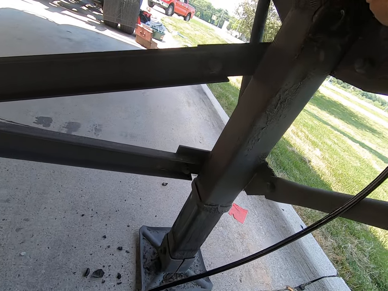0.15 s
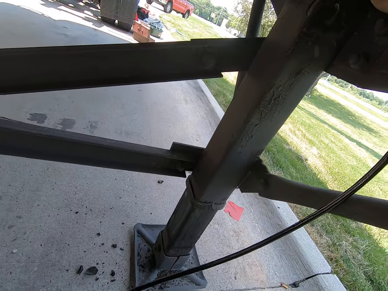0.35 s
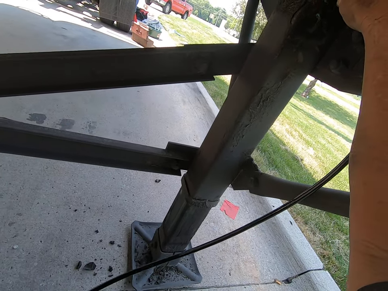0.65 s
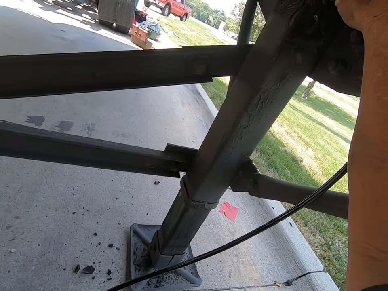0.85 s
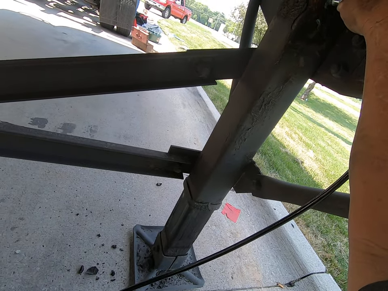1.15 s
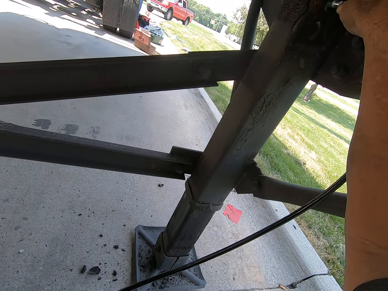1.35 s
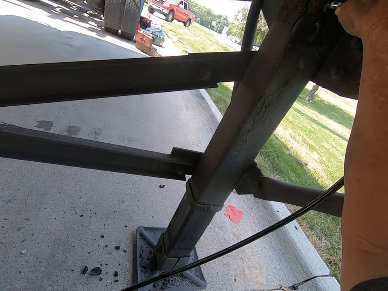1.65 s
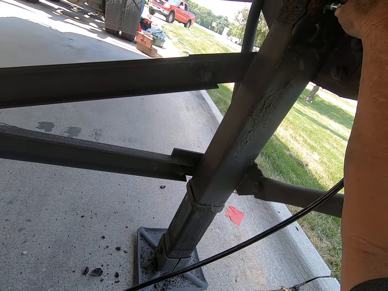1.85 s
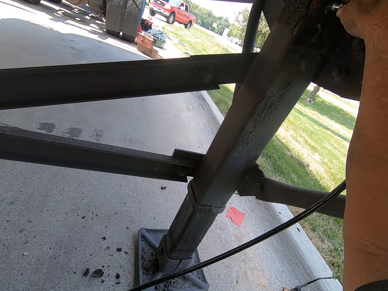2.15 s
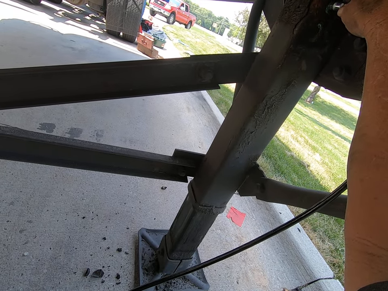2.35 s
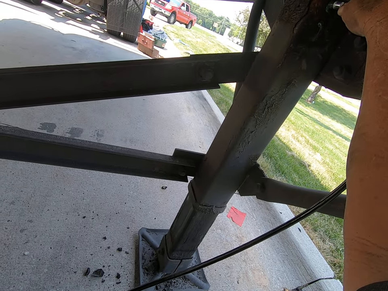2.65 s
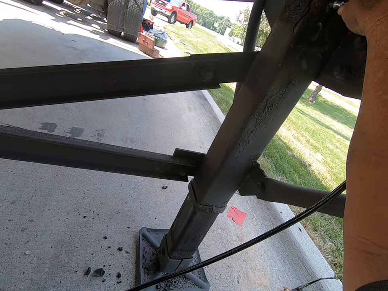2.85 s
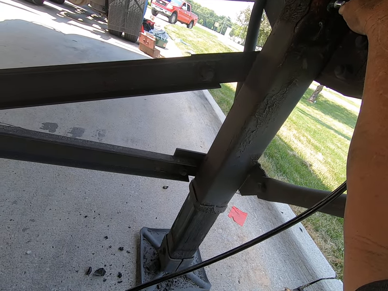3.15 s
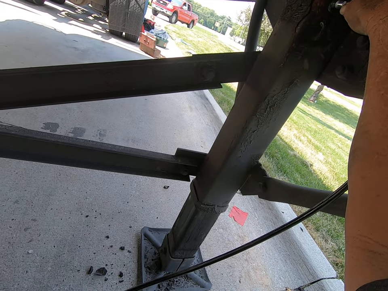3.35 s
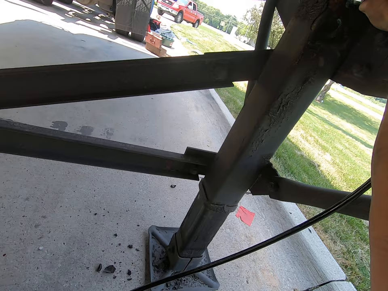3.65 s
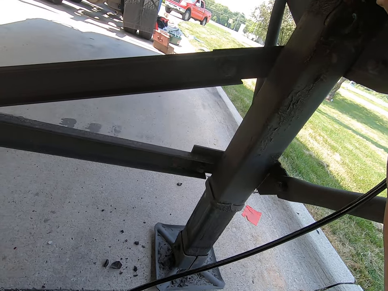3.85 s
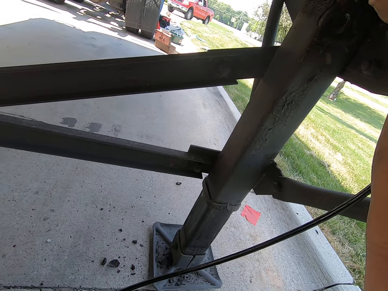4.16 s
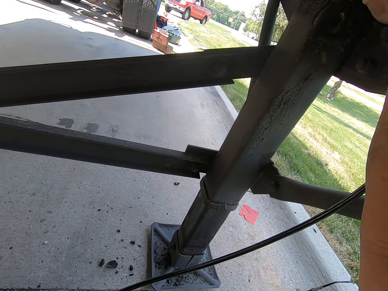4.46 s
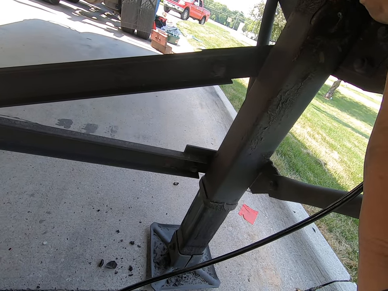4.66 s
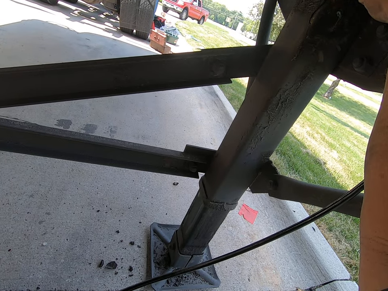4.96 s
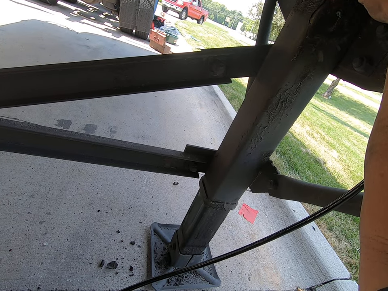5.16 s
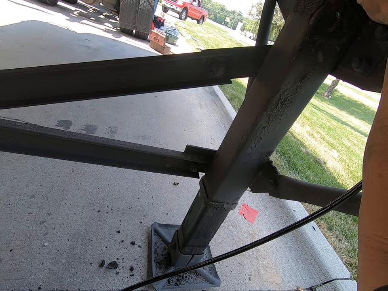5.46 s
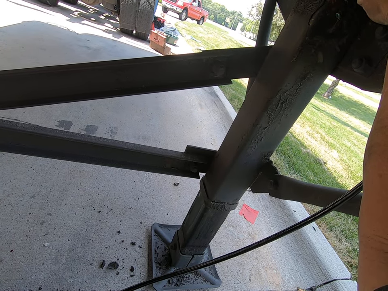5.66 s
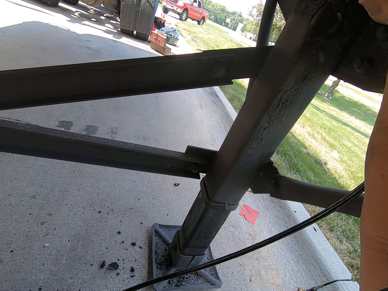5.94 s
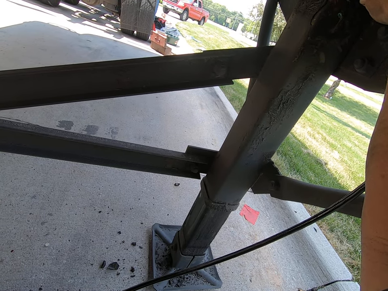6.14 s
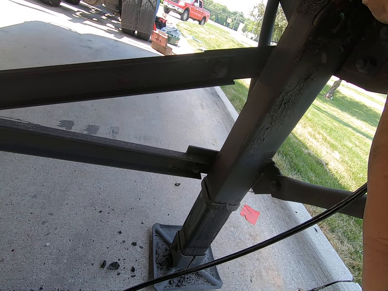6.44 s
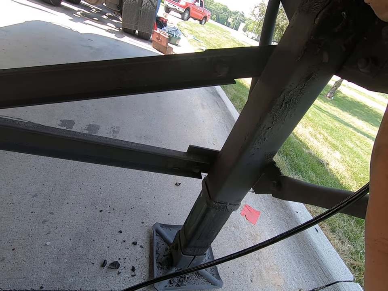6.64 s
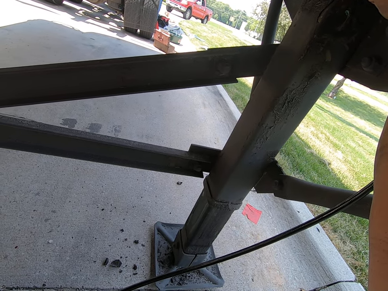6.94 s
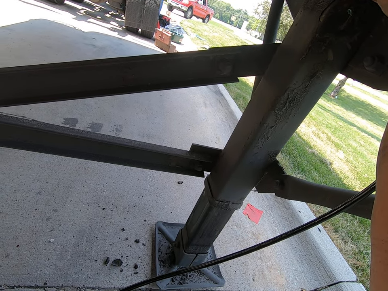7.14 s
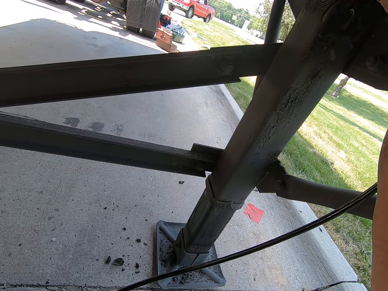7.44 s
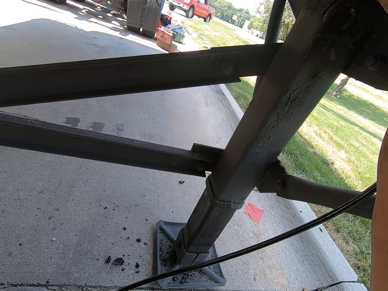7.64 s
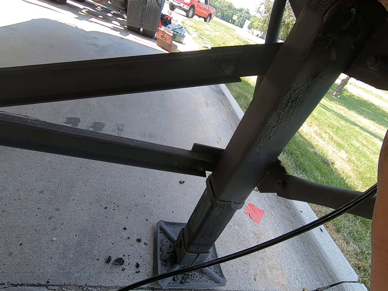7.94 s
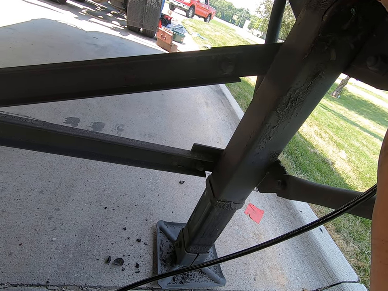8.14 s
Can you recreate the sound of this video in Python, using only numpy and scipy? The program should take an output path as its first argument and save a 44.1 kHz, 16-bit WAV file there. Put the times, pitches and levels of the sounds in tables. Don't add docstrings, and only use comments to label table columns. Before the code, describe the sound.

Outdoors, close stereo microphone, with idling machines farther off. From 0 seconds a low, slowly beating engine hum and rough rumble sit under a faint blower tone, thin hiss and soft wind buffeting, strongest in the first two seconds. At about 0.2 a hard metal coupler knocks a steel frame, rings briefly and rattles dully. Near 0.75 a small trigger clicks; a very short electronic whistle follows as the motor spins up by about 0.95. From 1.0 to the end near 8.3 the cordless grease gun pumps without stopping, about seven strokes a second: each a sharp bright clack with a body slap, gears whining upward around four kilohertz, then a smaller bite and gritty grind as pressure loads it and pitch sags. The rhythm is mechanical and very even, growing barely harder. The gun dominates; engine drone continues beneath.

```python
import sys
import numpy as np
from scipy import signal
from scipy.fft import rfft, irfft, next_fast_len
from scipy.io import wavfile
from scipy.ndimage import uniform_filter1d

SR = 44100
rng = np.random.default_rng(int(sys.argv[2]) if len(sys.argv) > 2 else 0)


def elevation(decibels):
    levels = np.asarray(decibels, float)
    return 10 ** (levels / 20)


def master_out(mix):
    frames = np.transpose(np.atleast_2d(mix))
    ceiling = np.clip(frames, -1, 1)
    pcm = np.round(ceiling * 32767).astype(np.int16)
    wavfile.write(sys.argv[1], SR, pcm)


N = 365897
T = np.arange(N) / SR
M = next_fast_len(N + SR // 4)
F = np.maximum(np.arange(M // 2 + 1) * SR / M, 1)

TURN_S = .1361
# f/Hz, likeness [0-1]
GUN_ALIKE = [(60, 0.95), (130, 0.99), (290, 1), (640, 0.77), (1410, 0.39), (3100, 0.79), (6820, 0.21),
             (15000, 0.04)]
# f/Hz, likeness [0-1], values below 0 count as 0
YARD_ALIKE = [(60, 1), (130, 1), (290, 0.91), (640, 0.8), (1410, 0.033), (3100, 0.42), (6820, -0.75),
              (15000, -0.04)]
# f/Hz, level/dB per Hz
THUD_TONE = [(300, -10), (550, 0), (900, -8), (2500, -1), (4500, -4), (7000, -9), (9000, -8), (11500, -20),
             (15000, -32)]


def along(table, t):
    s, *columns = np.transpose(table)
    return [np.interp(t, s, column) for column in columns]


def over_hz(table):
    hz, value = np.transpose(table)
    return np.interp(np.log(F), np.log(np.maximum(hz, 1)), value)


def body(tone, modes=(), lift=0.75):
    db = over_hz(tone)
    for hz, width_hz, mode_db in modes:
        db = db + lift * mode_db / (1 + (2 * (F - hz) / width_hz) ** 2)
    cepstrum = irfft(np.log(elevation(db)), M)
    cepstrum[1:M // 2] *= 2
    cepstrum[M // 2 + 1:] = 0
    response = np.exp(rfft(cepstrum))
    return response / np.sqrt(np.mean(np.abs(response) ** 2))


def sound(spectra):
    return irfft(spectra, M)[:, :N]


def ports(drive, response, alike, balance=((20, 0), (20000, 0))):
    mid, side = rfft(drive, M) * response
    likeness = np.clip(over_hz(alike), 0, .99)
    tilt = elevation(over_hz(balance) / 2)
    mid = mid * np.sqrt((1 + likeness) / 2)
    side = side * np.sqrt((1 - likeness) / 2)
    return sound(np.array([(mid + side) * tilt, (mid - side) / tilt]))


def walk(rate):
    hold = int(SR / rate)
    steps = np.repeat(rng.standard_normal(N // hold + 1), hold)
    return 1.065 * uniform_filter1d(uniform_filter1d(steps, hold), hold)[:N]


def hiss(envelope, grit_db=0.):
    grain = elevation(grit_db * np.minimum(rng.exponential(size=N), 5))
    return rng.standard_normal((2, N)) * envelope * grain / np.sqrt(np.mean(grain ** 2))


def bursts(starts, contacts, repeat=0.):
    span = int(6 * SR * max(row[1] for row in contacts))
    out = np.zeros((2, N + SR))
    same = rng.standard_normal((len(contacts), 2, span))
    for s, db in starts:
        for (lag, length, rel_db, scatter_db), habit in zip(contacts, same):
            level_chance, time_chance = np.clip(rng.standard_normal(2), -1.5, 1.5)
            fresh = rng.standard_normal((2, span))
            noise = np.sqrt(repeat) * habit + np.sqrt(1 - repeat) * fresh
            u = np.arange(span) / (length * SR)
            shape = np.minimum(3 * u, 1) * np.exp(-1.5 * u)
            hit = noise * shape
            hit *= np.sqrt(np.sum(shape ** 2) / np.sum(hit ** 2, axis=1, keepdims=True))
            i = int((s + lag + 0.00019 * scatter_db * time_chance) * SR)
            out[:, i:i + span] += elevation(db + rel_db + scatter_db * level_chance) * hit
    return out[:, :N]


def engines():
    crank_hz = (14.2185, 18.6635, 16.252, 138.01)
    # multiple of the crank rate, level/dB rms
    truck = [(2, -72), (4, -39.5), (5, -44.5), (9, -48.5), (10, -52), (11, -64), (12, -39.5), (13, -43),
             (16, -58), (17, -54.5)]
    pump = [(3, -34.5), (5, -48), (6, -46.5), (7, -70), (8, -52)]
    reefer = [(2, -42), (3, -55), (5, -51), (8, -47), (10, -52)]
    fan = [(1, -34.5), (2, -53)]
    null_s = 4.34
    hum = 0
    for sign, hz, orders in zip((1, -1, 1, 1), crank_hz, (truck, pump, reefer, fan)):
        for k, db in orders:
            level = sign * elevation(db + 1.0 * walk(3.26))
            hum = hum + level * np.sin(2 * np.pi * int(round(k)) * hz * (T - null_s) + np.pi / 2)
    return np.sqrt(2) * hum * elevation(np.array([[-.3], [.3]]))


def gusts():
    # t/s, level/dB
    peaks = [(0, -26), (1.13, -22.5), (1.71, -29), (3.2, -36), (4.4, -39), (5.45, -34), (6.12, -34)]
    rise_db_per_s, fall_db_per_s, lull_db = 19, 44, -51
    gain = elevation(lull_db)
    for s, db in peaks:
        gain = gain + elevation(db - np.maximum(rise_db_per_s * (s - T), fall_db_per_s * (T - s)))
    return gain


def yard():
    # f/Hz, level/dB per Hz
    idle_tone = [(20, -22), (35, -14), (58, -9), (90, -13), (135, -6), (181, -11), (215, -19), (640, -25),
                 (817, -30), (1080, -26), (1700, -29), (3300, -38), (5500, -52), (15000, -95)]
    hiss_tone = [(3000, -12), (6000, -3), (8500, 0), (10500, -4), (12000, -5), (13500, -11), (15000, -26)]
    wind_tone = [(15, -14), (35, -2), (60, 0), (100, -4), (160, -16), (300, -36), (1000, -70), (8000, -130)]
    # f/Hz, width/Hz, lift/dB
    blower = [(493, 25, 6), (1389, 83, 9)]
    idle_level = elevation(-33.5 + .9 * walk(3.08) + 1.0 * walk(15))
    idle = ports(hiss(idle_level), body(idle_tone, blower), YARD_ALIKE)
    far = ports(hiss(elevation(-66.5)), body(hiss_tone), [(20, .1), (20000, 0)])
    wind_level = gusts() * elevation(-8.0 + 2.0 * walk(5.7))
    wind = ports(hiss(wind_level), body(wind_tone), [(20, 0.19), (20000, 0.25)])
    return idle + far + wind


def knock():
    # t/s, length/s, level/dB, scatter/dB
    tick_hits = [(.2178, .003, -29, 0)]
    blow_hits = [
        (.2182, .003, -12, 0),
        (.221, .0045, -12, 0),
        (.225, .0065, -14, 0),
        (.232, .014, -21, 0),
        (.245, .02, -32, 0),
    ]
    rattle_hits = [
        (.222, 0.019, -29, 0),
        (.245, 0.024, -24.5, 0),
        (.265, 0.02, -34, 0),
        (.28, .014, -32, 0),
    ]
    # f/Hz, level/dB per Hz
    blow_tone = [(150, -24), (250, -17.5), (774, -16.5), (1210, -16), (1790, -22), (2200, -31), (2480, -26),
                 (2700, -41), (3810, -37.5), (5010, -46), (7180, -41.5), (15000, -73)]
    rattle_tone = [(150, -20), (300, -5), (600, 5), (1000, 1), (1500, -14), (3000, -37), (8000, -70)]
    # f/Hz, width/Hz, lift/dB
    frame = [(326, 60, 10), (560, 23, 11), (970, 64, 7), (1230, 85, 7), (1770, 110, 11), (2400, 150, 4),
             (3780, 150, 5)]
    blow = ports(bursts([(0, 0)], blow_hits), body(blow_tone, frame, 0.93), YARD_ALIKE)
    rattle = ports(bursts([(0.0007, 0)], rattle_hits), body(rattle_tone, frame, 0.72), YARD_ALIKE)
    tick = ports(bursts([(0.0038, 0)], tick_hits), body(THUD_TONE, frame), GUN_ALIKE)
    return blow + rattle + tick


def switch():
    # t/s, length/s, level/dB, scatter/dB
    clicks = [
        (0.744, 0.0056, -37, 0),
        (.759, .002, -28, 0),
        (0.7606, 0.0033, -21.5, -1),
        (0.766, 0.011, -38, 0),
    ]
    # f/Hz, level/dB per Hz
    click_tone = [(700, -37), (1500, -10), (2700, -1), (3500, -9), (4400, -8), (5700, -5), (7000, 2),
                  (9000, -10), (11500, -20), (15700, -26)]
    # t/s, level/dB of first tone, level/dB of second tone
    chop_levels = [(.775, -70, -62), (.785, -53, -49), (.805, -44, -48), (.83, -41, -54), (.868, -44, -57),
                   (.885, -60, -70)]
    first_db, second_db = along(chop_levels, T)
    phase = 2 * np.pi * 1985 * T
    chop = elevation(first_db) * np.sin(phase) + elevation(second_db) * np.sin(2 * phase)
    chop = np.sqrt(2) * chop * (np.abs(T - .83) < .06)
    return chop + ports(bursts([(0.00066, 0)], clicks), body(click_tone), GUN_ALIKE)


def gears(turn, run):
    # t/s, level/dB
    load = [(0, -4), (.015, -12.5), (.035, -14.5), (.07, -13.5), (.078, -5.5), (.085, -3), (.11, 0),
            (.136, -4)]
    # f/Hz, level/dB per Hz
    gear_tone = [(290, -26), (500, -16), (602, -8.5), (823, -10.5), (1060, -12), (1610, -7.5), (2230, -4),
                 (4110, -5.5), (4290, -3), (5380, -14.5), (9250, -10.5), (12100, -23.5), (15000, -39)]
    grind_tone = [(290, -46), (500, -8), (859, -9), (1110, -10), (1580, -9), (1750, -11), (2020, -7),
                  (2230, -6), (2960, -5.5), (4110, -5.5), (5380, -10.5), (9120, -9.5), (15000, -35)]
    # f/Hz, width/Hz, lift/dB
    housing = [(705, 20, 4), (848, 51, -17), (1062, 280, 8), (1380, 59, 6.5), (1762, 77, 6),
               (2047, 27, -17.5), (2260, 185, 5), (2536, 24, 3), (2646, 48, 5.5), (3286, 65, 4.5),
               (3660, 68, 2.5), (4950, 93, 6), (5640, 140, 4), (7230, 690, 4), (8310, 85, 1.5),
               (9050, 140, 2)]
    # f/Hz, level/dB
    balance = [(60, -3), (110, 4), (200, -4), (380, 0), (700, -2), (1290, 2.5), (2380, 1.5), (4400, 0),
               (8120, -0.5), (15000, 7)]
    free_drive = hiss(run * elevation(-28.5), grit_db=2.5)
    free = ports(free_drive, body(gear_tone, housing, 1.4), GUN_ALIKE, balance)
    grind_drive = hiss(run * elevation(-26.5 + along(load, turn)[0]), grit_db=2.0)
    return free + ports(grind_drive, body(grind_tone, housing, 0.83), GUN_ALIKE, balance)


def swells(turn):
    # t/s into the turn, half length/s, level/dB
    bells = [(.018, .006, -39), (.039, .008, -32), (.074, .017, -29), (.097, .008, -39), (.124, .014, -29)]
    gain = elevation(-50.5)
    for s, half_s, db in bells:
        gap = (turn - s + TURN_S / 2) % TURN_S - TURN_S / 2
        gain = gain + elevation(db) * np.exp(-(gap / half_s) ** 2)
    return gain


def whine(turn, speed, sing_db):
    # t/s, f/Hz
    mesh_hz = [(0, 4060), (.012, 4170), (.025, 4240), (.043, 4285), (.064, 4365), (.083, 4378),
               (.112, 4030), (.129, 4005), (.1361, 4060)]
    # t/s, level/dB
    shudder = [(0, -18), (.075, -22), (.086, -5), (.095, -2), (.108, -4), (.116, -16), (.1361, -18)]
    # order of the shaft rate, level/dB
    shaft = [(8, -39), (10, -38), (11, -36), (12, -40), (12.6, -40), (13.4, -38)]
    teeth = 13
    wobble = 1 + 0.0016 * walk(150) + 0.0038 * walk(12)
    mesh = 2 * np.pi * np.cumsum(along(mesh_hz, turn)[0] * speed * wobble) / SR
    sing = swells(turn) * elevation(2.14 * walk(90) + 0.53 * walk(25))
    tone = sing * np.array([elevation(1.0) * np.sin(mesh + 0.7), elevation(-2.3) * np.sin(mesh)])
    orders = sum(elevation(db + 4.0 * walk(60)) * np.sin(mesh * k / teeth) for k, db in shaft)
    return np.sqrt(2) * elevation(sing_db) * (tone + elevation(along(shudder, turn)[0]) * orders)


def strokes():
    turns, first_snap_s, jitter_s = 54, .9919, .0004
    first_late_s = .002
    since = np.arange(turns) * TURN_S
    time_chance, level_chance = np.clip(rng.standard_normal((turns, 2)), -2, 2).T
    s = first_snap_s + since + first_late_s * (since == 0) + jitter_s * time_chance
    db = -10.6 + .08 * since + .8 * level_chance
    return np.transpose([s, db])


def plunger(snaps):
    # t/s after the snap, length/s, level/dB, scatter/dB
    clack_hits = [(-.0005, .001, -6, 1), (.0007, .0013, .5, 1), (.002, .0013, -3.5, 1.5),
                  (.0078, .0022, -10, 1.5), (.004, .012, -16, 1), (.0115, .003, -17, 2),
                  (.019, .004, -23, 3)]
    slam_hits = [(-.0012, 0.00068, 3.5, 1.8), (.0012, 0.00049, 5, 1.17), (.0032, 0.00096, -6.5, 0.53),
                 (.0068, .004, -7.5, 2), (.011, 0.0046, -10.5, 1.67)]
    bite_hits = [
        (.0792, .003, -4, 2),
        (.082, .004, -9, 1.8),
    ]
    # f/Hz, level/dB per Hz
    clack_tone = [(2000, -30), (3500, -14), (4700, -8), (6300, -2), (7300, 0), (9300, -6), (11500, -17),
                  (15000, -29)]
    slam_tone = [(900, -29), (1800, -9.5), (2450, -2.5), (3300, -8.5), (4500, 4), (7000, -37)]
    # f/Hz, width/Hz, lift/dB
    yoke = [(2220, 300, 6), (2726, 190, 9), (3297, 43, 4), (4400, 120, -2), (4973, 450, 5.5),
            (5670, 110, 7), (7190, 220, 6.5), (8850, 210, 5.5)]
    # f/Hz, level/dB
    balance = [(60, -3), (110, 4), (200, -4), (380, 0), (700, -2), (1290, 2.5), (2380, 1.5), (4400, 0),
               (8120, -0.5), (15000, 7)]
    clack = elevation(3.0) * bursts(snaps, clack_hits, repeat=0.6)
    slam = elevation(-4.0) * bursts(snaps, slam_hits, repeat=0.58)
    bite = bursts([(s, -14) for s in snaps[:, 0]], bite_hits, repeat=1.0)
    return (ports(clack, body(clack_tone, yoke, 1.3), GUN_ALIKE, balance)
            + ports(slam, body(slam_tone, yoke, 1.53), GUN_ALIKE, balance)
            + ports(bite, body(THUD_TONE, yoke, 0.35), GUN_ALIKE, balance))


def gun():
    # t/s, share of full speed, noise level/dB, whine level/dB
    spin = [(0, .8, -70, -70), (.77, .8, -60, -70), (.8, .8, -24, -60), (.85, .82, -13, -40),
            (.9, .89, -5, -26), (.915, .9, -3, -2), (.95, .96, 0, 0), (.975, 1, 0, 0), (8.3, 1, 0, 0)]
    snaps = strokes()
    s = snaps[:, 0]
    marks = np.r_[s[0] - TURN_S, s, s[-1] + TURN_S]
    turn = np.interp(T, marks, np.arange(len(marks))) % 1 * TURN_S
    speed, run_db, sing_db = along(spin, T)
    run = elevation(run_db + 1.0 * walk(40) + 0.36 * walk(250))
    return gears(turn, run) + whine(turn, speed, sing_db) + plunger(snaps)


def scene():
    return engines() + yard() + knock() + switch() + gun()


def roll_off(x):
    return signal.sosfilt(signal.butter(12, 15870, fs=SR, output="sos"), x)


def record(dry):
    # f/Hz, level/dB
    port_tone = [(20, 0), (9200, 0), (10500, -5), (11700, -9), (13000, -5), (14700, 0), (15300, -8),
                 (15900, -40)]
    # t/s, level/dB
    gain = [
        (0, 4.5),
        (.9, 5),
        (1.05, 2.5),
        (1.4, 1.3),
        (1.8, 0.5),
        (8.3, 0.5),
    ]
    heard = sound(rfft(dry, M) * elevation(over_hz(port_tone))) * elevation(along(gain, T)[0])
    ceiling = .85
    return roll_off(ceiling * np.tanh(heard / ceiling))


dry = scene()
out = record(dry)
master_out(out)
```